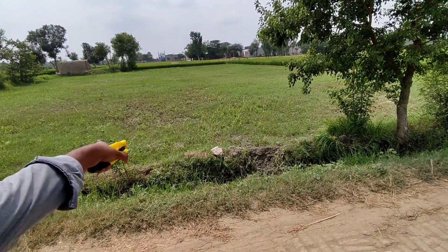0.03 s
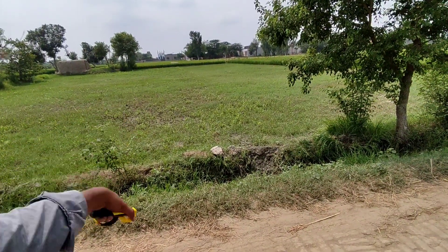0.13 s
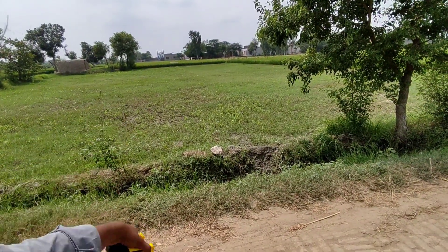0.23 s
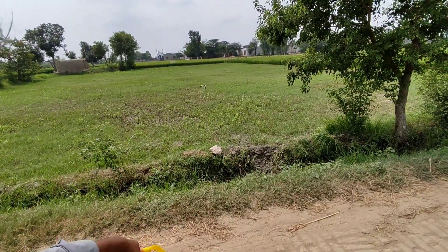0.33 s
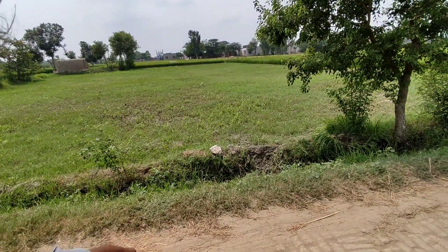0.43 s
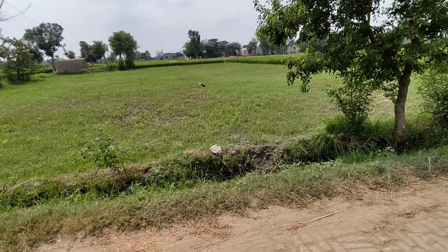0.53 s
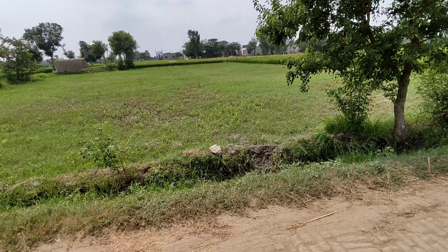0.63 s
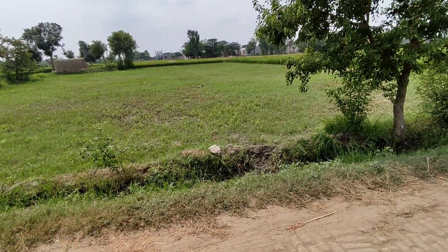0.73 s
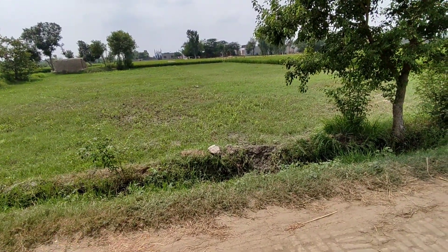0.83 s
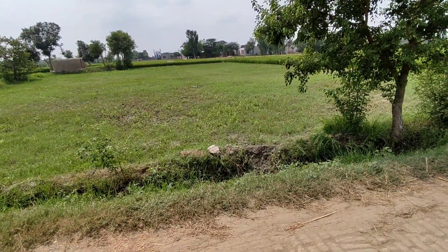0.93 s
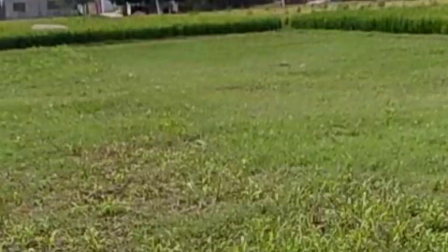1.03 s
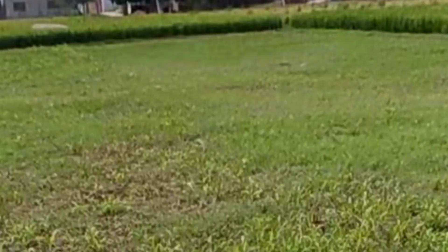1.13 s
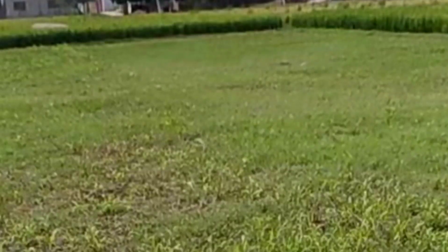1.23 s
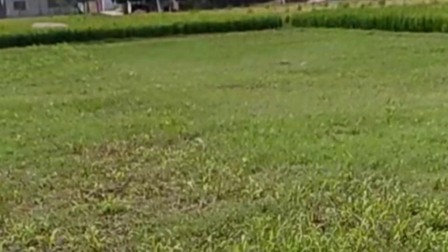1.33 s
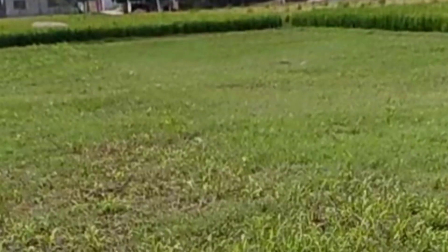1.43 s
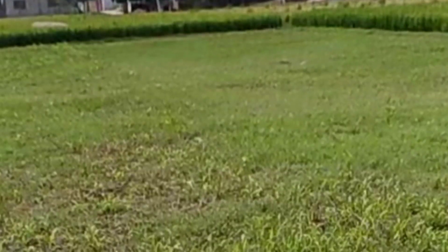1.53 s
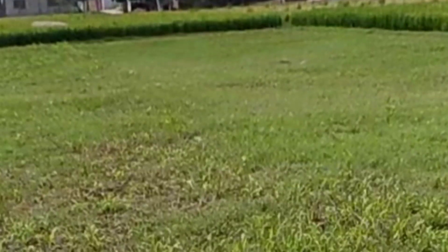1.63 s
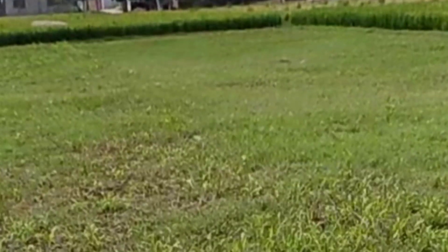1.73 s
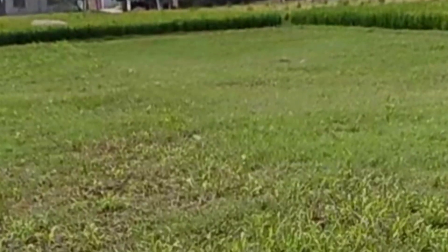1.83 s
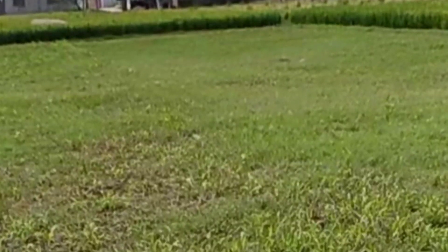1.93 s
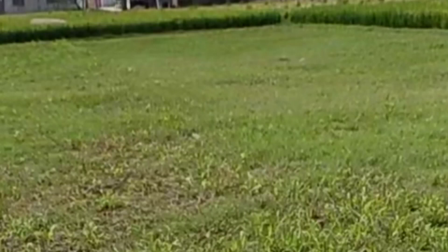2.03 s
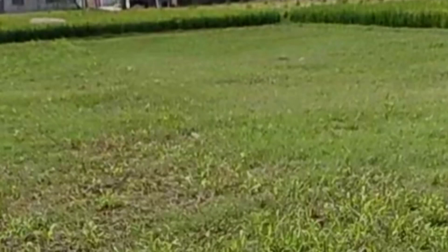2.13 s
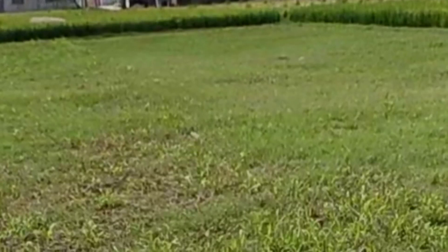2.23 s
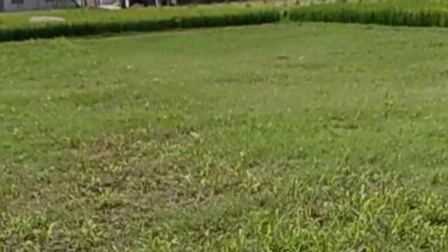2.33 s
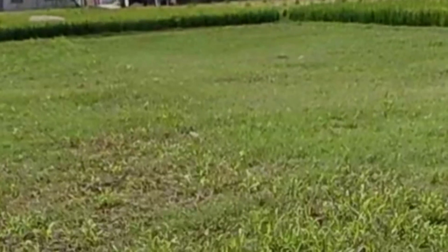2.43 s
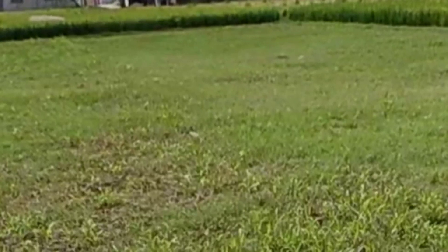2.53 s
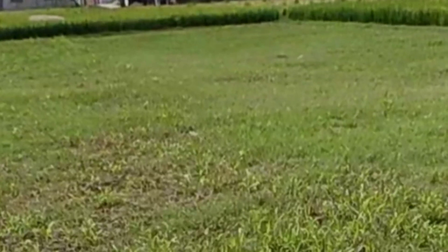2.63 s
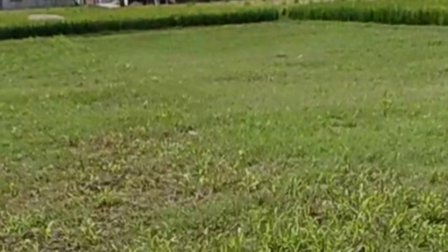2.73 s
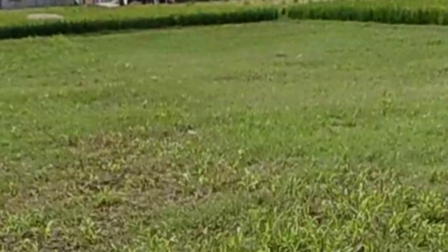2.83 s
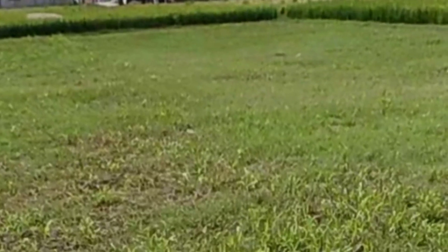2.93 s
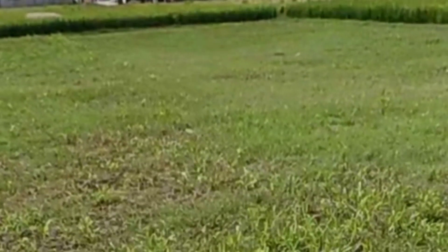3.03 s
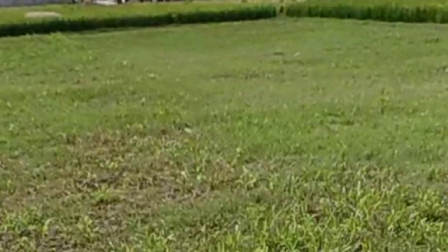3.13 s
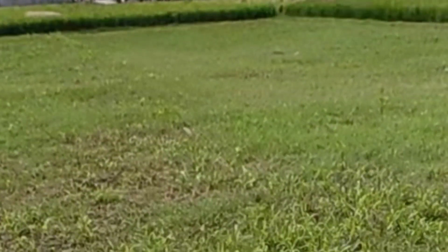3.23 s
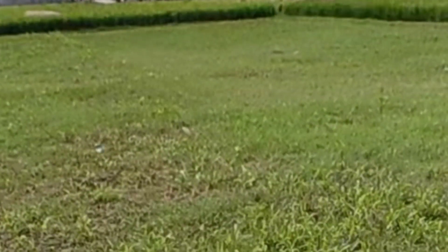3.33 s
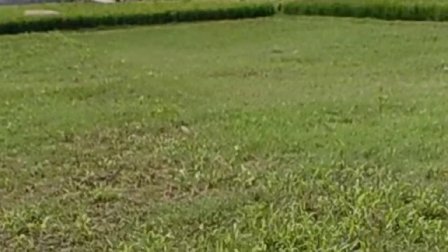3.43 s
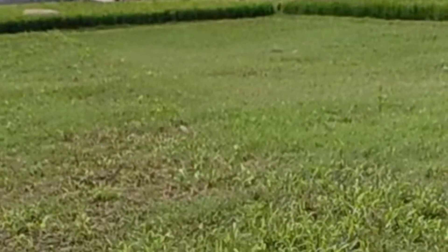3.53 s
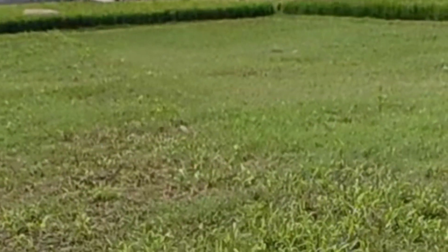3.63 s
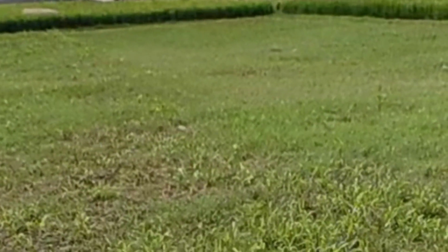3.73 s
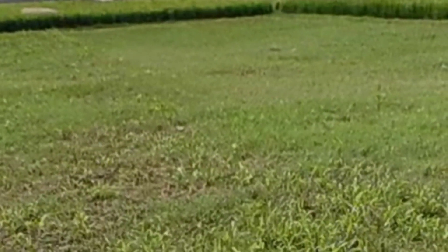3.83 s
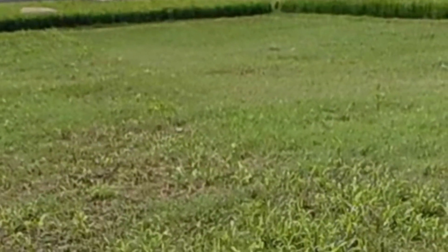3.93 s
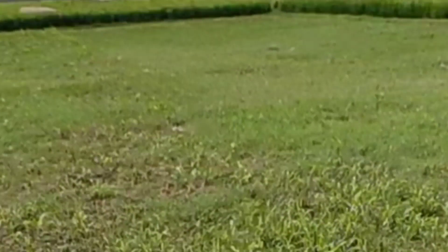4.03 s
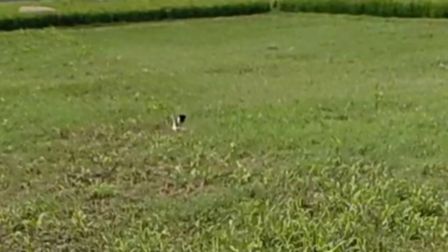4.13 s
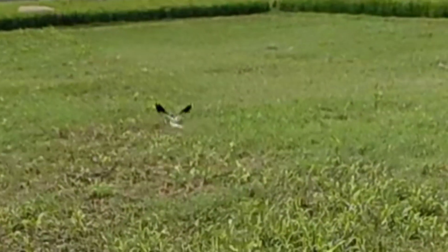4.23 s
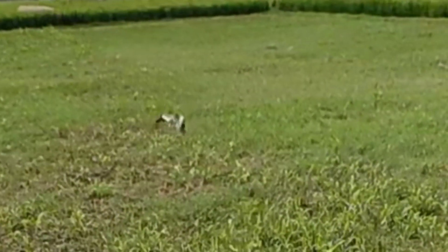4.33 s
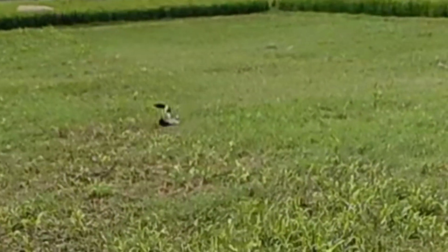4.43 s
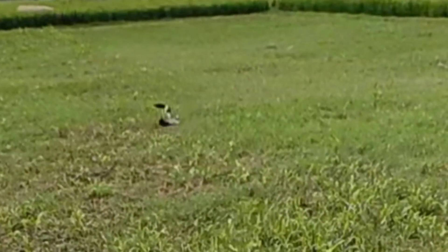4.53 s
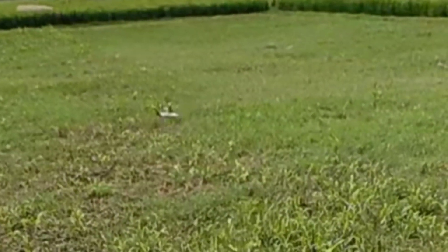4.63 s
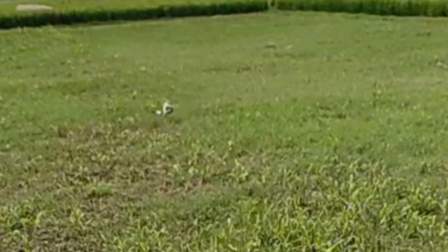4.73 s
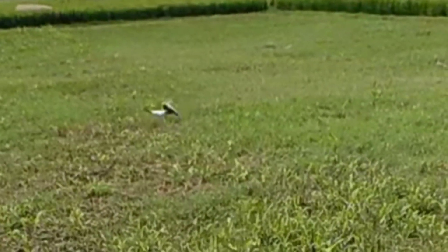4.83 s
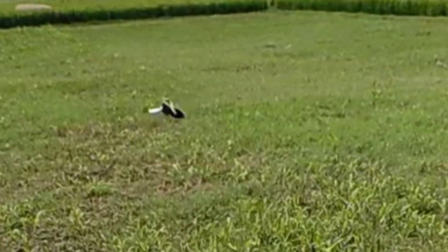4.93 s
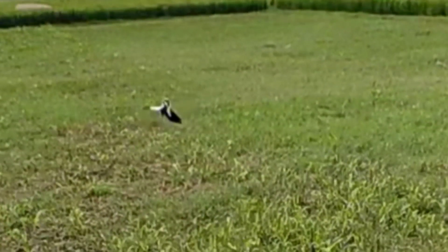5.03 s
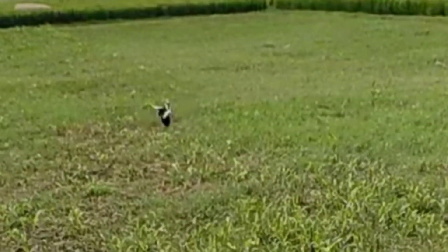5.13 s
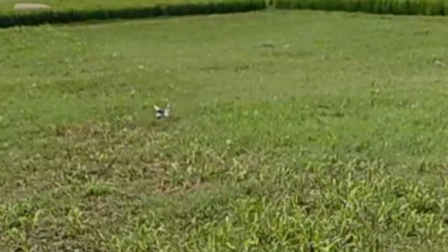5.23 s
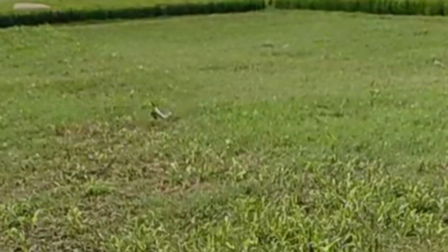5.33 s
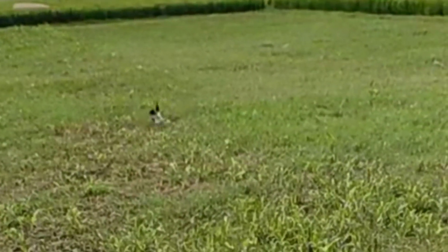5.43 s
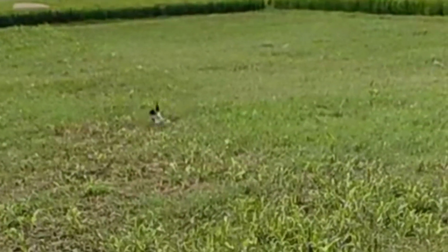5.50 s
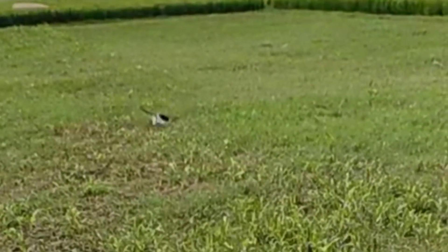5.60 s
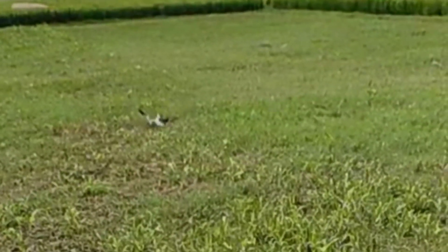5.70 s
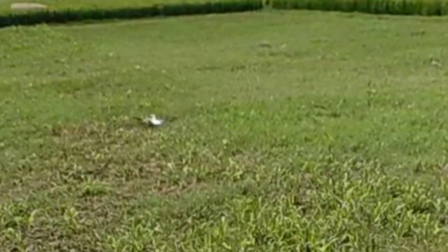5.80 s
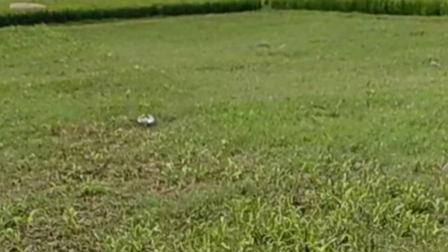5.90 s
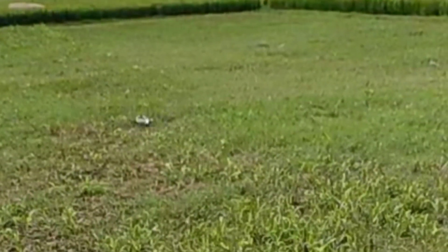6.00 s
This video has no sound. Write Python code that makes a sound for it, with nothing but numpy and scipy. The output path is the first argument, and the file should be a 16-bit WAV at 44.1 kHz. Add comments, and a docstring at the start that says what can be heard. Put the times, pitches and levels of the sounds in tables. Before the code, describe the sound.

A slingshot fires close to the microphone in an open field, its rubber bands making one sharp, fluttering snap and a few faint taps. A grasshopper whines thinly over a light breeze. Then everything repeats in slow motion: the insect drops to a lower buzzing tone, faint bird chirps pass, and the snap returns as a deeper, longer noisy burst, followed by soft taps.

```python
"""Slingshot in a field, with slow-motion replay

Rubber bands slap out, recoil and tap the ringing plastic fork. A grasshopper scrapes its wings near
10 kHz, a breeze buffets the microphone, far birds chirp. At 1.27 s the shot replays at 0.3 speed, so
snap and buzz return far lower. Event times are those of the live shot; only the replay reaches before 0 s."""
import sys
import numpy as np
from scipy import signal
from scipy.fft import rfft, irfft, next_fast_len
from scipy.io import wavfile
from scipy.ndimage import uniform_filter1d, minimum_filter1d

SR = 44100
rng = np.random.default_rng(int(sys.argv[2]) if len(sys.argv) > 2 else 0)


def wav_record(signal):
    """Record a signal, one row per channel, as 16-bit PCM in the file named by sys.argv[1]."""
    frames = np.transpose(np.atleast_2d(signal))
    bounded = np.clip(frames, -1, 1)
    # unit amplitude maps onto the largest positive 16-bit level
    quanta = np.round(bounded * 32767).astype(np.int16)
    wavfile.write(sys.argv[1], SR, quanta)


N = 267378
START_S, CUT_S = -.56, 1.266
T = np.arange(START_S, CUT_S + .05, 1 / SR)


def amp(db):
    return 10 ** (np.asarray(db) / 20)


def unit_rms(x):
    return x / np.sqrt(np.mean(x ** 2) + 1e-20)


def pan(side_db):
    """Constant-power gains; side_db is left over right."""
    return unit_rms(amp([[side_db / 2], [-side_db / 2]]))


def add(mix, start_s, sound):
    part = mix[:, max(round((start_s - START_S) * SR), 0):][:, :sound.shape[-1]]
    part += sound[..., :part.shape[1]]


def colour(x, points):
    """Minimum-phase filter through (Hz, dB) points."""
    size = next_fast_len(x.shape[-1] + 2048)
    hz, db = np.transpose(points)
    log_hz = np.log(abs(np.fft.fftfreq(size, 1 / SR)) + 1)
    log_gain = np.log(amp(np.interp(log_hz, np.log(hz), db)))
    response = np.exp(np.conj(signal.hilbert(log_gain)))
    return np.fft.ifft(np.fft.fft(x, size) * response).real[..., :x.shape[-1]]


def noise_pair(size, correlation):
    """White noise at the two microphone ports, partly shared."""
    left, other = rng.standard_normal((2, size))
    return np.array([left, correlation * left + np.sqrt(1 - correlation ** 2) * other])


def wander(rate_hz):
    """Smooth random curve of unit RMS."""
    hz = np.fft.rfftfreq(len(T), 1 / SR)
    spectrum = rfft(rng.standard_normal(len(T))) * np.exp(-(hz / rate_hz) ** 2)
    return unit_rms(irfft(spectrum, len(T)))


def low_pass(x, hz):
    taps = signal.firwin(301, hz, window=("kaiser", 8), fs=SR)
    return signal.oaconvolve(x, taps[None], "same")


def band_slaps(approach_s=.0024, crack_s=.00054, left_lag_s=.00036):
    """Rubber flutters around each short burst: a bright crack over the dull knock of pouch and fork."""
    # The bands slap out and back, then tap the fork; faint stray ticks sound before and after.
    # Each row: time in seconds, crack in dB, flutter in dB, flutter decay in seconds,
    # body relative to crack in dB, left over right in dB.
    slaps = [(0.097, -17, -11.5, 0.004645, -19.5, -3), (0.1119, 7.5, -8, 0.011, -15, 0),
             (0.1308, -1.5, -23, .004, -20, -7.5), (0.1326, 1, -17.5, .011, -9.5, 5.5),
             (.1379, 0, -20.5, .007, -16.5, -1), (.2615, -31, -42.5, .003, -13.5, 0),
             (0.407, -32, -50.5, .003, -11.5, -4.5), (.442, -31.5, -55.5, 0.0027, -19.5, -8.5),
             (0.446, -26, -31.5, 0.0062, -6, 4.5), (0.483, -43.5, -48, 0.025, -3.5, -0.5),
             (0.5, -33.5, -33.5, 0.0019, 0.5, 4), (0.589, -47.5, -58, .003, -16, 37),
             (-.248, -52, -48, .003, -17.5, 11)]
    # Spectra of crack and knock. Each row: frequency in Hz, density in dB.
    crack_spectrum = [(1000, -37.5), (3200, -26.5), (4600, -22), (5500, -10), (7000, -5.5), (8500, -2),
                      (9500, 2), (10500, 2.5), (12000, -7), (14000, -13.5)]
    body_spectrum = [(60, -9), (200, -1), (500, 1), (950, -5.5), (1400, 1.5), (2000, 3.5), (3000, -16.5),
                     (3800, 6), (4600, 1.5), (6500, -16.5), (12000, -32)]
    out, t = np.zeros((2, len(T))), np.arange(-(SR // 100), SR // 10) / SR
    after = np.maximum(t, 0)
    burst = (1 - np.exp(-after / (.49 * crack_s))) * np.exp(-after / crack_s)
    for time_s, crack_db, flutter_db, decay_s, body_db, side_db in slaps:
        swell = np.exp(-(t / np.where(t < 0, approach_s, decay_s)) ** 2)
        flutter = swell * amp(2 * wander(700)[:len(t)])
        envelope = np.hypot(amp(crack_db) * burst / burst.max(), amp(flutter_db) * flutter)
        crack = unit_rms(colour(envelope * noise_pair(len(t), .34), crack_spectrum))
        blow = envelope * noise_pair(len(t), .44)
        body = unit_rms(unit_rms(colour(blow, body_spectrum)) + fork_ring(blow))
        level = np.sqrt(np.mean(envelope ** 2))
        add(out, time_s + t[0], pan(side_db) * level * (crack + amp(body_db) * body))
    out[0] = np.roll(out[0], round(left_lag_s * SR))  # the left port is further from the fork
    return out


def fork_ring(blow, ring_db=-5):
    """A blow sets the plastic fork ringing briefly."""
    # Each row: mode frequency in Hz, relative level in dB, T60 in seconds.
    modes = [(404.7, -7.5, 0.02), (1404, -2.5, 0.028), (2087, 4, 0.0087), (3902, -3.5, 0.025),
             (4547, 1, 0.025), (8060, 6, .025)]
    t = np.arange(SR // 10) / SR
    ring = sum(amp(db - 60 * t / t60_s) * np.sin(2 * np.pi * hz * t) for hz, db, t60_s in modes)
    return amp(ring_db) * unit_rms(signal.fftconvolve(blow, ring[None], axes=1)[:, :blow.shape[1]])


def air_puffs(left_db=-12, leak_hz=4):
    """Low thumps of air on the right port, from the bands, the arm and a late wind gust."""
    # Each row: start in seconds, level in dB, rise in seconds, fall in seconds.
    puffs = [(0.0972, -10, 0.0003, 0.0021), (0.1121, -11, 0.00051, 0.03), (0.216, -20.5, .003, 0.0073),
             (1.153, -24, 0.0065, 0.003)]
    out, t = np.zeros((2, len(T))), np.arange(SR // 2) / SR
    for start_s, db, rise_s, fall_s in puffs:
        push = (1 - np.exp(-t / rise_s)) ** 2 * np.exp(-t / fall_s)
        add(out, start_s, amp(db) * amp([[left_db], [0]]) * push / push.max())
    return signal.sosfilt(signal.butter(1, leak_hz, "high", fs=SR, output="sos"), out)


def knocks_and_rustles():
    """Resonant noise: a soft knock, the first slap's hollow thump, rustles of pouch, sleeve and grass."""
    # Each row: start in seconds, centre in Hz, width in Hz, level in dB, decay in seconds.
    swells = [(-.114, 830, 700, -51, 0.0046), (.093, 1950, 700, -27.5, 0.0061),
              (.094, 452, 351.2, -29.5, .0015), (.214, 3020, 1600, -49.5, 0.013),
              (.219, 9290, 5000, -46, 0.015), (0.254, 6300, 9000, -56, 0.036),
              (.451, 7800, 9000, -45.5, 0.0045), (0.503, 7200, 12500, -62.5, 0.043),
              (0.778, 4500, 3060, -60, 0.12), (1.05, 361, 320, -57.5, 0.03)]
    out, t = np.zeros((2, len(T))), np.arange(SR // 2) / SR
    for start_s, hz, width_hz, db, decay_s in swells:
        b, a = signal.iirpeak(hz, hz / width_hz, fs=SR)
        ring = signal.lfilter(b, a, signal.lfilter(b, a, noise_pair(len(t), .4)))
        envelope = t / decay_s * np.exp(1 - t / decay_s)
        add(out, start_s, amp(db) * unit_rms(ring) * envelope)
    return out


def grasshopper(track, strokes_hz, sweep_hz, tone_db, rasp_db, stop_s=np.inf, width_hz=150):
    """Each wing stroke scrapes a narrow, sliding resonance, with a wide rasp trailing below it."""
    # Each row: offset from the pitch in Hz, density in dB.
    rasp_spectrum = [(-4000, -40), (-2200, -22.5), (-1300, -11), (-500, -3), (1.5, -0.5), (248.5, 5.5),
                     (518, -19.5), (2501.5, -35.5)]
    times_s, pitches_hz, levels_db = np.transpose(track)
    pitch_hz = np.interp(T, times_s, pitches_hz)
    level = amp(np.interp(T, times_s, levels_db)) * (T < stop_s)
    cycles = np.cumsum(strokes_hz * (1 + .025 * wander(25))) / SR
    stroke = 1 + .3 * np.cos(2 * np.pi * cycles)
    slide_hz = sweep_hz * ((cycles + .5) % 1 - .5)
    carrier = np.exp(2j * np.pi * np.cumsum(pitch_hz - slide_hz) / SR)
    grass_scatter = np.array([wander(width_hz) + 1j * wander(width_hz) for _ in range(2)])
    tone = (carrier * (1 + .74 * grass_scatter)).real * stroke
    offset_hz = np.fft.fftfreq(len(T), 1 / SR)
    skirt = amp(np.interp(offset_hz, *np.transpose(rasp_spectrum), left=-80, right=-80))
    scrape = np.fft.ifft(np.fft.fft(noise_pair(len(T), 0)) * skirt)
    rasp = (scrape * carrier).real * (1 + .07 * stroke)
    return level * (amp(tone_db) * pan(16.5) * unit_rms(tone) + amp(rasp_db) * pan(1.1) * unit_rms(rasp))


def breeze(rumble_db=-46.5, hiss_db=-60, growth_db_per_s=2):
    """Wind rumbles on the ports, gusting on the right; grass and leaves hiss, slowly growing."""
    # Each row: centre in seconds, half length in seconds, level over the steady rumble in dB.
    gusts = [(-.14, 0.025, 0.5), (0.653, 0.008, 2), (0.771, 0.014, 9.5), (1.15, .015, 2)]
    # Spectra of port rumble and leaf hiss. Each row: frequency in Hz, density in dB.
    rumble_spectrum = [(5, -6), (15, 2.5), (60, 1.5), (100, -7.5), (160, -14), (300, -23.5), (600, -27.5),
                       (2000, -50)]
    leaf_spectrum = [(100, -11), (600, -13.5), (1000, -8), (2000, -5.5), (3000, -10.5), (5500, -13),
                     (6500, -11), (11000, -4.5), (14000, -23)]
    buffet = sum(amp(db) * np.exp(-((T - centre_s) / half_s) ** 2) for centre_s, half_s, db in gusts)
    rumble = unit_rms(colour(noise_pair(len(T), .47), rumble_spectrum))
    rumble *= amp(rumble_db + .5 * wander(41))
    hiss = unit_rms(colour(noise_pair(len(T), .0057), leaf_spectrum))
    hiss *= amp(hiss_db + growth_db_per_s * T + 1.5 * wander(60))
    return np.hypot(pan(-1.4), pan(-13.5) * buffet) * rumble + pan(.55) * hiss


def birds(top_fraction=.26, bend=.22):
    """Faint arched, falling whistles, blurred on their way across the field."""
    # Each row: start in seconds, length in seconds, top pitch in Hz, level in dB.
    chirps = [(-.378, .022, 8100, -70), (-.320, .028, 5100, -62), (-.288, 0.022, 4900, -64.5),
              (-.270, 0.014, 3360, -64), (-.2, .06, 5400, -66.5), (.296, 0.036, 5230, -62.5),
              (.807, 0.038, 5460, -62)]
    out = np.zeros((2, len(T)))
    for start_s, length_s, top_hz, db in chirps:
        progress = np.linspace(0, 1, int(length_s * SR))
        arch = 1 - bend * (progress - top_fraction) ** 2
        hz = top_hz * arch * (1 + .025 * wander(700)[:len(progress)])
        whistle = np.sin(2 * np.pi * np.cumsum(hz) / SR)
        add(out, start_s, amp(db) * np.sin(np.pi * progress) * whistle)
    return field_scatter(out, wet_db=1, t60_s=.014)


def field_scatter(x, wet_db, t60_s, rise_s=.0016):
    """Ground and grass scatter a short, thin tail."""
    t = np.arange(SR // 2) / SR
    tail = rng.standard_normal((2, len(t))) * amp(-60 * t / t60_s) * (1 - np.exp(-t / rise_s))
    tail /= np.linalg.norm(tail[0])
    return x + amp(wet_db) * signal.fftconvolve(x, tail, axes=1)[:, :len(T)]


def cut_dip(depth_db=-8, dip_s=1.158, fall_s=.043, restored_s=-.504, rise_s=.045):
    """Gain that sinks just before the cut and swells back as the replay opens."""
    sunk = np.maximum((T - dip_s) / fall_s, (restored_s - T) / rise_s)
    return amp(depth_db * np.clip(sunk, 0, 1))


def limiter(x, threshold_db=-13, max_cut_db=12, hold_s=.057, release_s=.015):
    """A loud peak turns the gain down at once; the gain holds briefly, then recovers."""
    size = int(hold_s * SR)
    over_db = np.clip(20 * np.log10(abs(x).max(0) + 1e-9) - threshold_db, 0, None)
    held_db = -minimum_filter1d(-np.minimum(2 * over_db, max_cut_db), size, origin=(size - 1) // 2)
    recovery_db = np.arange(x.shape[1]) / SR * max_cut_db / release_s
    cut_db = np.maximum.accumulate(held_db + recovery_db) - recovery_db
    return x * amp(-uniform_filter1d(cut_db, size=40))


def scene():
    """Slingshot, two grasshoppers, breeze and birds in an open field."""
    # One grasshopper rises in pitch as it works harder; its neighbour soon stops.
    # Each row: time in seconds, pitch in Hz, level in dB.
    singer = [(-0.53, 9520.0, -48.5), (-0.3, 9650.0, -49), (-0.1, 9630, -53), (0.05, 9460.0, -51.5),
              (0.36, 9570, -50), (0.55, 9750.0, -46.5), (0.66, 9800, -54), (0.92, 10010, -46),
              (1.15, 10020, -47.5)]
    neighbour = [(-.56, 10300, -51), (-.51, 10090, -42.5), (-.41, 10120, -46.5), (-.385, 9440, -58)]
    insects = grasshopper(singer, strokes_hz=63.1, sweep_hz=259.4, tone_db=-2.5, rasp_db=-4)
    insects += grasshopper(neighbour, strokes_hz=61.2, sweep_hz=-300, tone_db=-3.5, rasp_db=-12.5,
                           stop_s=-.35)
    shot = field_scatter(band_slaps(), wet_db=-20.5, t60_s=.18)
    return (shot + air_puffs() + insects + breeze() + birds() + knocks_and_rustles()) * cut_dip()


def record(dry, speed=.3, replay_db=-6, replay_zero_s=3.0663):
    """Port colour, limiter, soft clip, band limit; the live shot cuts to a replay slowed like tape."""
    # The right port is duller at the top. Each row: frequency in Hz, gain in dB.
    right_port = [(4000, 0), (7500, 0), (9000, 4.5), (10200, -5.5), (11200, -11.5), (13000, -1),
                  (14500, -3)]
    ports = np.array([dry[0], colour(dry[1], right_port)])
    clipped = .9 * np.tanh(limiter(ports) / .9)
    live = low_pass(clipped, hz=14500)
    slow = signal.resample(live, round(len(T) / speed), axis=1)
    cut = round(CUT_S * SR)
    opening = live[:, round(-START_S * SR):][:, :cut]
    skip_s = CUT_S - replay_zero_s - START_S / speed  # live 0 s recurs at replay_zero_s
    replay = slow[:, round(skip_s * SR):][:, :N - cut]
    return low_pass(np.hstack([opening, amp(replay_db) * replay]), hz=15000)


dry = scene()
out = record(dry)
wav_record(out)
```